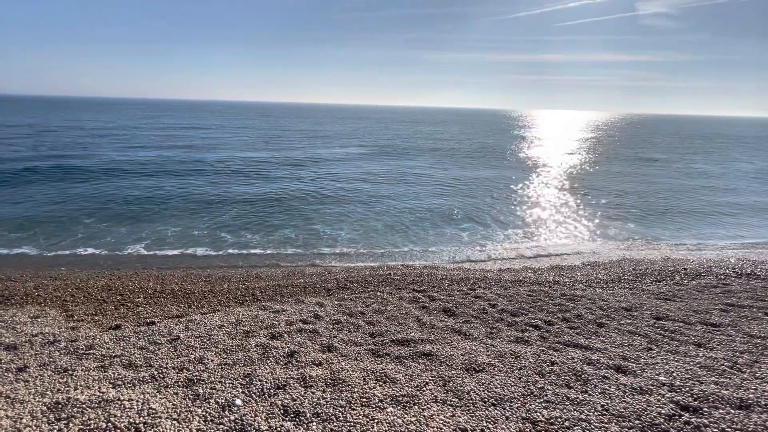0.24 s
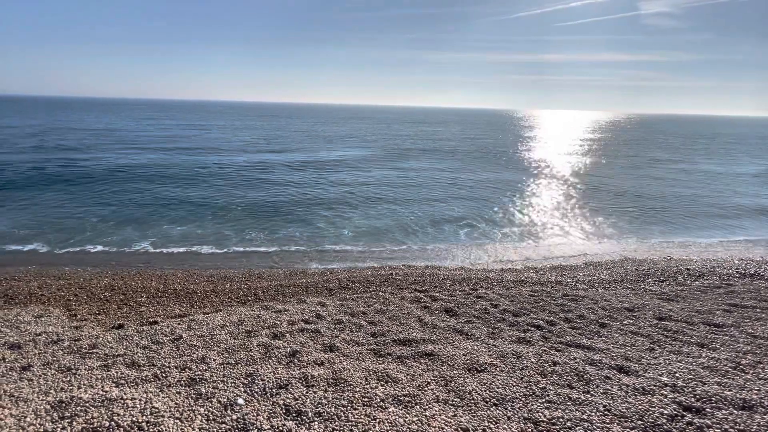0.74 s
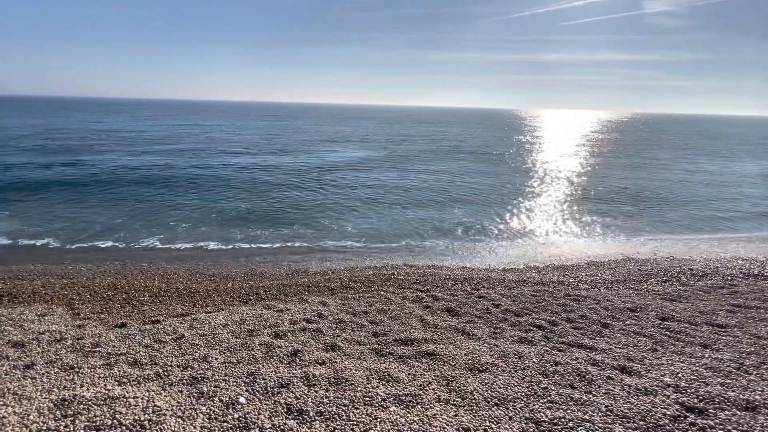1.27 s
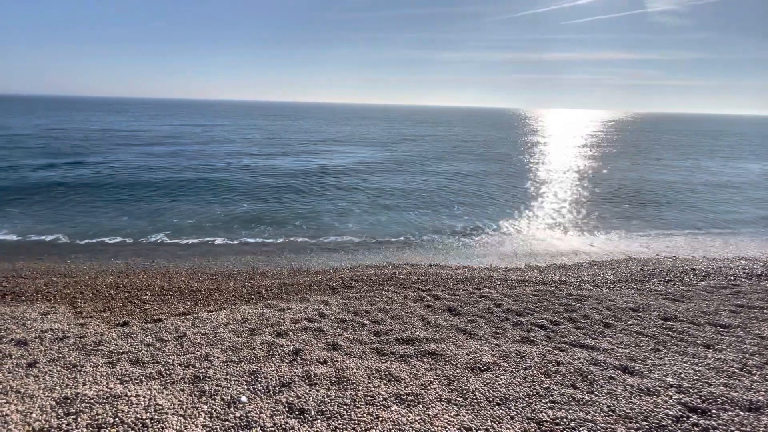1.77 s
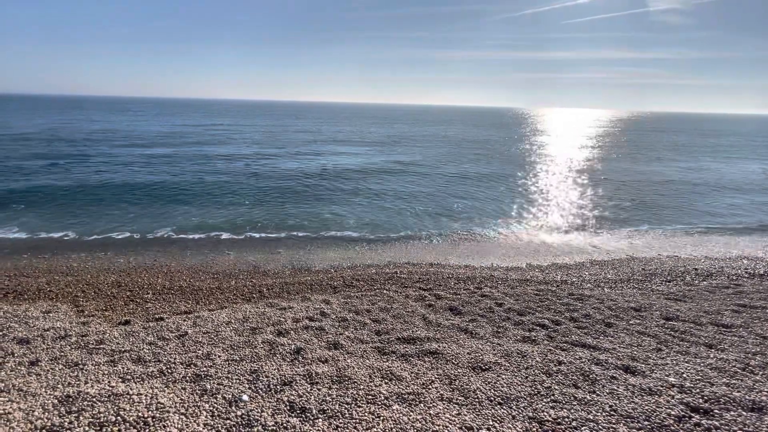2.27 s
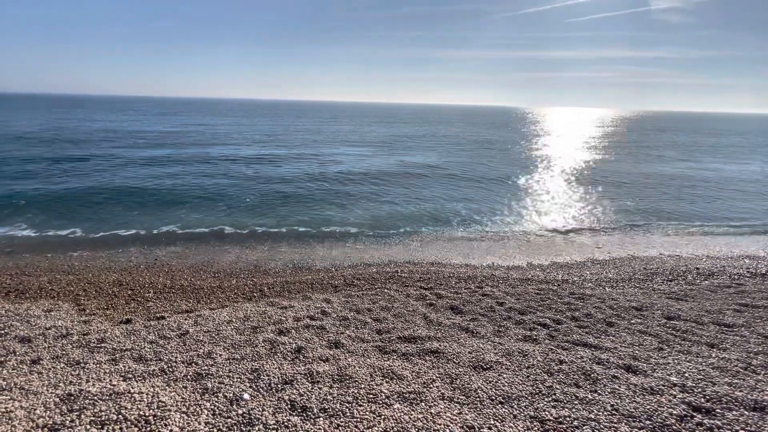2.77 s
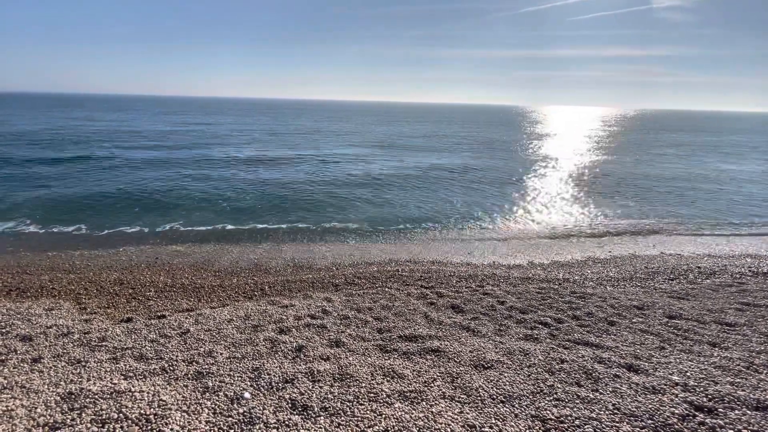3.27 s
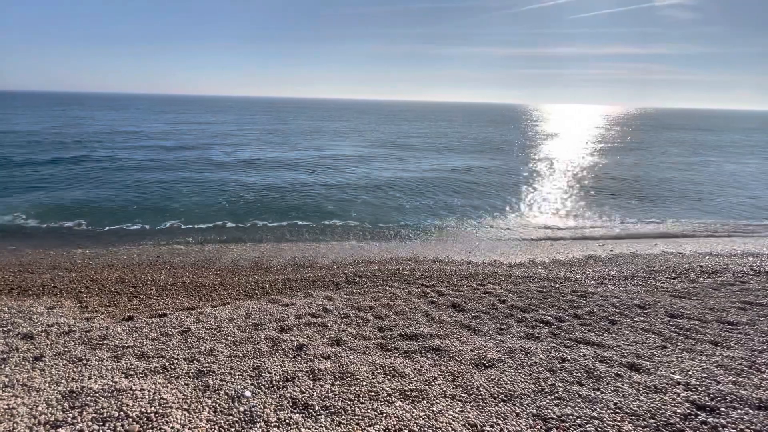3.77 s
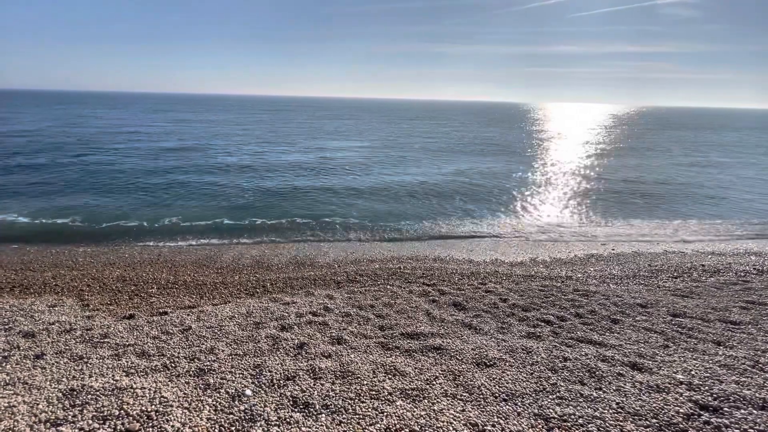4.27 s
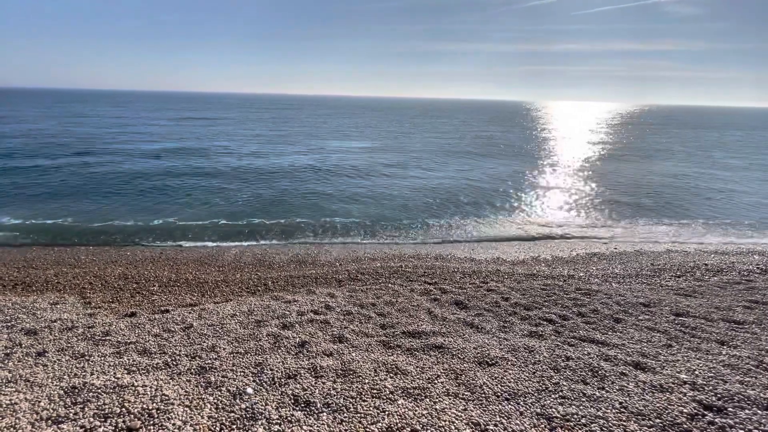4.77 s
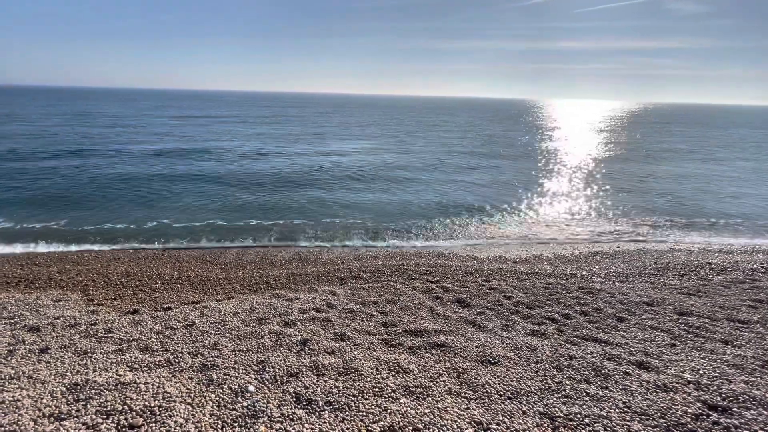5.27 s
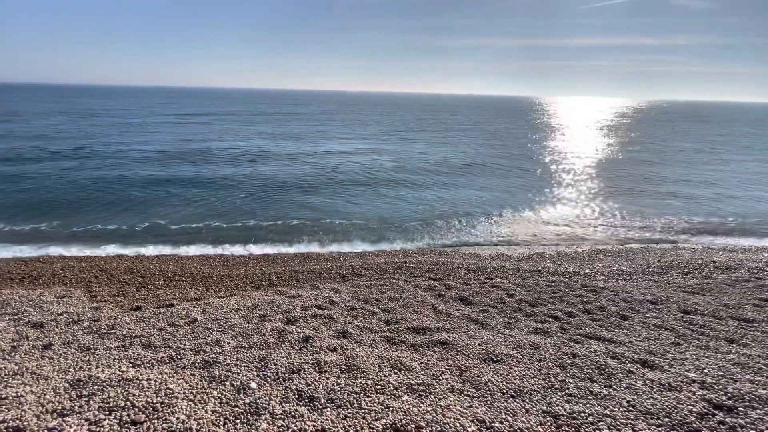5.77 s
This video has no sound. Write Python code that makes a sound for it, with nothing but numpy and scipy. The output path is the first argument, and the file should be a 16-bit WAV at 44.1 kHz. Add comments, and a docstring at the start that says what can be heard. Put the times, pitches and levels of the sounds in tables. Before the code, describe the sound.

Small waves wash up and drain back over pebbles with a steady surf hiss, then a low breaker folds as wind buffets the microphone.

```python
"""A pebble beach with small waves, heard from up the shingle at a pair of close microphone ports.
Backwash, swash, spill and breaker are noise with shaped spectra, coherence and phase between the ports;
brief decaying sines add the stones' knocks. The swash arrives first at the right, the breaker at the left.
Wind is coloured noise in puffs and short gusts. A faint engine, perhaps a far boat, is two harmonics
of a wavering note over low rumble."""
import sys
import numpy as np
from scipy import signal
from scipy.fft import rfft, irfft
from scipy.io import wavfile
from scipy.ndimage import uniform_filter1d

SR = 44100
rng = np.random.default_rng(int(sys.argv[2]) if len(sys.argv) > 2 else 0)


def unload_wav(signal):
    """Save mono or channel-first audio to the path in sys.argv[1] as 16-bit WAV at rate SR, clipped to [-1, 1]."""
    wavfile.write(
        sys.argv[1],
        SR,
        np.round(np.clip(np.atleast_2d(signal).T, -1, 1) * 32767).astype(np.int16),
    )


N = 265393  # samples, about 6 s

# half-width of the rounded crest of each wave's swell [s]
CREST_S = 0.35


def gain_of(db):
    """Level to amplitude: 20 dB is a factor of ten."""
    return 10 ** (np.asarray(db) / 20)


def evened(x):
    """Normalization of mean power: scales a signal to rms 1."""
    return x / np.sqrt(np.mean(x ** 2) + 1e-20)


def at_hz(table, hz):
    """Logarithmic frequency scale: interpolates each column of a table along log frequency."""
    f, *columns = np.transpose(table)
    return [np.interp(np.log(hz + 1), np.log(f + 1), column) for column in columns]


def coloured(x, colour):
    """Linear filtering: multiplies the spectrum by a colour, then scales to rms 1."""
    response_db = at_hz(colour, np.fft.rfftfreq(N, 1 / SR))[0]
    return evened(irfft(rfft(x) * gain_of(response_db), N))


def panned(db):
    """Level difference at constant power: gains of left and right for a left-minus-right level."""
    pair = np.array([gain_of(db / 2), gain_of(-db / 2)])
    return pair / np.sqrt(np.mean(pair ** 2, axis=0))


def noise_pair(correlation):
    """Partial correlation: white noise at two ports, in opposition where the correlation is negative."""
    left, other = rng.standard_normal((2, N))
    right = correlation * left + np.sqrt(1 - correlation ** 2) * other
    return np.array([left, right])


def lumps(shape, size):
    """Random fluctuation smoothed by moving averages over size = (steps in time, bins), at rms 1."""
    field = rng.standard_normal(shape)
    along_time = uniform_filter1d(field, size[0], axis=0)
    return evened(uniform_filter1d(along_time, size[1], axis=1))


def swell(peak_s, rise_db_per_s, fall_db_per_s, hold_s):
    """Exponential growth and decay: a gain straight in dB on both sides, rounded off at 1."""
    t = np.arange(N) / SR - peak_s
    slope = np.where(t < 0, rise_db_per_s, fall_db_per_s)
    return gain_of(-slope * (np.hypot(t, hold_s) - hold_s))


def swells(events, rise_db_per_s, fall_db_per_s, hold_s):
    """Addition of powers: one swell for each (time [s], level [dB]), summed in mean square."""
    power = sum((gain_of(db) * swell(s, rise_db_per_s, fall_db_per_s, hold_s)) ** 2 for s, db in events)
    return np.sqrt(power)


def water(colour, shore, patchy_db, flicker_db, surge_db, pitch=((0, 1),), glide_below_hz=1700):
    """Superposition of countless bubbles and stones: Gaussian noise, patchy, flickering and surging."""
    frame, hop = 1024, 256
    bins = np.fft.rfftfreq(frame, 1 / SR)
    t = np.arange(N // hop + 5) * hop / SR
    shape = (len(t), len(bins))
    # the low bubble notes glide; the effect fades out towards the hiss above them
    glide = np.exp(-(bins / glide_below_hz) ** 2)
    hz = bins / np.interp(t, *np.transpose(pitch))[:, None] ** glide
    a, b, c, d = rng.standard_normal((4, *shape))
    coherence, lead, side_db = at_hz(shore, hz)
    coherence = np.clip(coherence, 0, 0.98)
    left = a + 1j * b
    shared = coherence * np.exp(-1j * lead) * left
    right = shared + np.sqrt(1 - coherence ** 2) * (c + 1j * d)
    patches = patchy_db * lumps(shape, size=(10, 12))
    flicker = flicker_db * lumps(shape, size=(3, 160))
    surge = surge_db * lumps((len(t), 1), size=(16, 1))
    field_db = at_hz(colour, hz)[0] + patches + flicker + surge
    z = np.array([left, right]) * panned(side_db) * gain_of(field_db)
    sound = signal.istft(z.transpose(0, 2, 1), nperseg=frame, noverlap=frame - hop)[1]
    return evened(sound[:, :N])


def pebbles(colour, lead_ms, per_s, spread_db, ring_s, count=24):
    """Impact excitation of damped modes: each stone size has its own ring, delay and side."""
    t, out = np.arange(256) / SR, np.zeros((2, N))
    for hz in np.geomspace(1500, 9000, count):
        struck = rng.random(N) < per_s / count / SR
        knocks = struck * gain_of(spread_db * np.minimum(rng.exponential(1, N), 4))
        # a positive lead delays the right port, a negative one the left; each size scales it by 0 to 2
        late = np.array([[0], [1]]) * lead_ms / 1000 * rng.uniform(0, 2)
        age = np.maximum(t - (late - late.min()), 0)
        ring = np.sin(2 * np.pi * hz * age) * np.exp(-age / ring_s)
        click = ring * panned(rng.normal(1.7, 4.0))[:, None]
        out += signal.oaconvolve(knocks[None], click, axes=1)[:, :N]
    return coloured(out, colour)


def backwash():
    """Drag by draining flow: water runs down through the shingle and knocks stones together."""
    # spectrum of the draining water: (frequency [Hz], relative density [dB])
    backwash_colour = [(40, -36), (150, -14), (350, -12), (600, -9), (900, -7.5), (1300, 0), (1900, 0.5),
                       (2450, 1.4), (2900, -3.5), (3600, -4), (4700, -9.5), (6300, -7.5), (8500, -15.5),
                       (10000, -21.5), (12500, -39)]
    # path to the ports from the shore ahead:
    # (frequency [Hz], coherence [0-1], left phase lead [rad], left minus right level [dB])
    shore_ahead = [(220.0, 0.5, 1, 2.0), (390.0, 0.54, 1.26, 4.5), (1110, 0.81, 3.17, 1.5),
                   (1810.0, 0.84, 3.36, 0.5), (2120, 0.04, 4.56, 0.5), (2280.0, 0.74, 6.0, -3),
                   (2540.0, 1, 7.2, 0.5), (2850, 0.6, 7.3, -1), (2950, 0.65, 7.8, 2.0),
                   (3470, 0.5, 8.4, 3.5), (3920.0, 0.2, 8.5, 4.5), (5210.0, 0.14, 2.7, 3.5),
                   (5940, 0.4, 3.6, 4), (6300, 0.5, 0.54, 0.5), (7900, 0.37, 3.3, 1.5),
                   (8600, 0.65, 1.1, -8), (9470.0, 0, 3.0, -1.5)]
    # slow gatherings, each until the next water covers it: (time of crest [s], level before mix [dB])
    drainings = [(2.2, -33), (4.7, -33)]
    rush = water(backwash_colour, shore_ahead, patchy_db=1.5, flicker_db=0.57, surge_db=0.1)
    stones = pebbles(backwash_colour, lead_ms=0.455, per_s=1300, spread_db=-2.5, ring_s=0.00044)
    flow = swells(drainings, rise_db_per_s=1.8, fall_db_per_s=11.5, hold_s=CREST_S)
    return flow * (gain_of(-1.0) * rush + gain_of(-17) * stones)


def breeze(lumpy_db=3.5, side_db=1.0):
    """Turbulent pressure fluctuation: eddies rumble unevenly at the ports and rise with each puff."""
    # spectrum of turbulence at a port: (frequency [Hz], relative density [dB])
    breeze_colour = [(12, -40), (28, -22), (55, 2.5), (90, -2.5), (150, -5), (250, -15.5), (400, -13.5),
                     (650, -40), (2000, -36)]
    # soft puffs over the steady breeze: (time of peak [s], level [dB])
    puffs = [(0.2, -52), (0.48, -52), (1.24, -54), (1.55, -47.5), (2.05, -55), (2.55, -49), (3.19, -51),
             (3.43, -49), (3.68, -54), (4.2, -33), (4.33, -35), (4.42, -31.5), (5.17, -41.5), (5.33, -45),
             (5.54, -36.5), (5.8, -46), (5.96, -42.5)]
    steady_db = -61
    unevenness = gain_of(lumpy_db * lumps((N, 1), size=(1500, 1))[:, 0])
    rumble = evened(coloured(noise_pair(-0.51), breeze_colour) * unevenness)
    puff_gain = swells(puffs, rise_db_per_s=140, fall_db_per_s=125, hold_s=0.056)
    wind = np.hypot(gain_of(steady_db), puff_gain)
    return wind * rumble * panned(side_db)[:, None]


def drone(waver_hz=0.26):
    """Harmonic series of a periodic source: a far engine's wavering note over well-correlated rumble."""
    # harmonics of the engine: (multiple of the fundamental, relative level [dB])
    engine_orders = [(1, 0.5), (2, -9)]
    # spectrum of the rumble: (frequency [Hz], relative density [dB])
    drone_colour = [(25, -39), (45, -3.5), (68, -1), (100, -3), (140, -11.5), (220, -13.5), (380, -9),
                    (600, -33), (1500, -58)]
    engine_hz, engine_db = 91.6, -49.5
    rumble_db, rumble_floor_db = -42, -60
    peak_s, hold_s = 3.83, 0.18
    # phase in turns is the running integral of frequency
    turns = np.cumsum(engine_hz + waver_hz * lumps((N, 1), size=(12000, 1))[:, 0]) / SR
    hum = evened(sum(gain_of(db) * np.sin(2 * np.pi * k * turns) for k, db in engine_orders))
    hum_gain = gain_of(engine_db) * swell(peak_s, 4, 10, hold_s)
    rumble_swell = gain_of(rumble_db) * swell(peak_s, 12, 23, hold_s)
    rumble_gain = np.hypot(rumble_swell, gain_of(rumble_floor_db))
    rumble = coloured(noise_pair(0.85), drone_colour)
    return hum_gain * hum + rumble_gain * rumble


def swash():
    """Run-up of a spent wave: a rush leading mostly at the right, with rolling stones and early foam."""
    # spectra of the rush and of the foam: (frequency [Hz], relative density [dB])
    swash_colour = [(40, -30), (150, -24.5), (350, -13.5), (650, -13.5), (950, -3), (1250, 0), (1600, -0.6),
                    (2000, 1.5), (2450, -3.5), (2900, -1.5), (3600, -9.5), (4700, -10.5), (6000, -17),
                    (7800, -13), (10000, -29.5), (12500, -37)]
    foam_colour = [(300, -15), (900, -1), (1200, -1), (2400, -1.5), (4000, 0.5), (6300, -3), (8000, -2.5),
                   (10000, -26), (12500, -33)]
    # path to the ports from the shore on the right:
    # (frequency [Hz], coherence [0-1], left phase lead [rad], left minus right level [dB])
    shore_right = [(220.0, 0.96, 0.6, 0.5), (600.0, 0.82, -2.2, 5), (690.0, 0.72, -2.8, 8.5),
                   (960, 0.36, 0.5, 2.0), (1330, 0.37, -2, 4.0), (1510.0, 0.95, -2.5, 3.5),
                   (1850.0, 0.18, -3.5, 8.5), (1980.0, 0.48, -5.1, 8), (2370.0, 0.25, -5.5, 7),
                   (2520, 0.31, -5, 7), (3030, 0.86, -6, 5.5), (3250, 0.54, -3.5, -5),
                   (3750, 0.36, -5.5, -3), (4350.0, 0.36, -0.2, -5), (5810.0, 0.8, 2.5, 0.5),
                   (6470, 0.48, -0.3, 7), (7360.0, 0.18, 4, 10.0), (8040, 0.35, -7, 10.0),
                   (9700, 0.22, -1.5, 3)]
    # pitch sinks as the swash spreads, then recovers a little: (time [s], frequency factor)
    swash_pitch = [(2.0, 1.03), (2.7, 0.97), (3.6, 0.92), (4.5, 0.97)]
    # quick run-ups that soak away slowly: (time of crest [s], level of the rush [dB])
    run_ups = [(0.1, -44.5), (2.72, -28)]
    foam_lead_s, foam_db = 0.77, -10  # relative to each run-up
    rush = water(swash_colour, shore_right, patchy_db=1.0, flicker_db=0.06, surge_db=0.05,
                 pitch=swash_pitch, glide_below_hz=4800)
    stones = pebbles(swash_colour, lead_ms=-0.27, per_s=1400, spread_db=2.0, ring_s=0.00046)
    foam = water(foam_colour, shore_right, patchy_db=1.5, flicker_db=0.9, surge_db=0.0)
    flow = swells(run_ups, rise_db_per_s=13, fall_db_per_s=4.5, hold_s=CREST_S)
    fronts = [(s - foam_lead_s, db + foam_db) for s, db in run_ups]
    fizz = swells(fronts, rise_db_per_s=21, fall_db_per_s=10, hold_s=CREST_S)
    return flow * (rush + gain_of(-19.0) * stones) + fizz * foam


def breaker():
    """Air entrainment and impact: the crest folds on the left, and bubbles roar as water thumps and sprays."""
    # spectra of the bubbles, the falling water and the spray: (frequency [Hz], relative density [dB])
    breaker_colour = [(40, -27), (150, -13), (280, -13.5), (380, -6.5), (490, -10.5), (620, 0), (720, 1),
                      (860, 1), (1000, -4), (1400, -7.5), (2200, -12.5), (3200, -15), (5000, -20),
                      (9000, -21), (12500, -34)]
    plunge_colour = [(50, -20), (140, -6), (185, -5), (225, 4), (275, 0), (400, 1.5), (500, -6), (900, -46)]
    splash_colour = [(200, -41), (600, -12), (1200, 0.5), (2500, 1.5), (3300, -1), (4500, -3), (6000, -5.5),
                     (8000, -5.5), (10000, -25), (12500, -32)]
    # path to the ports from the shore on the left:
    # (frequency [Hz], coherence [0-1], left phase lead [rad], left minus right level [dB])
    shore_left = [(220.0, 0.1, 2.35, 1.5), (390.0, 0.79, 1.04, -0.5), (613, 0.52, 3.05, 6.5),
                  (784, 0.46, 1.8, 6), (950.0, 0.47, 2.44, 6.5), (1230, 0.55, 3.1, -2),
                  (1560, 0.26, 4.2, 5), (1810.0, 1, 1.9, 3.5), (2280.0, 0.4, 4.6, 5.0),
                  (2500.0, 0.66, 8.9, 13), (2840.0, 0.96, 5.3, 4.5), (3190.0, 0.33, 8.5, 8),
                  (3960.0, 0.36, 10.3, 0), (4280, 0.49, 11.2, -1), (5120.0, 0.34, 13.0, -2),
                  (5810.0, 0.63, 15.8, 1), (6200, 0.39, 11.8, 7), (7670.0, 0.23, 16, 5),
                  (8530.0, 0.35, 13.5, 2.0), (9470.0, 0.1, 19, -1)]
    # the roar deepens overall as the fold traps larger bubbles: (time [s], frequency factor)
    breaker_pitch = [(4.2, 1.45), (4.8, 1.05), (5.35, 1.07), (5.85, 0.98)]
    # a brief burst of roar and spray at 0.1 s, then successive collapses along the crest: (time [s], spray
    # level [dB], thump level [dB])
    collapses = [(0.1, -40.5, -52.5), (3.33, -44, -48), (3.8, -44, -52), (4.19, -54, -38), (4.28, -50, -38),
                 (4.4, -42.5, -35.5), (4.56, -57, -38.5), (4.82, -37.5, -41.5), (5.149, -33.5, -39),
                 (5.32, -36.5, -38.5), (5.45, -41, -38), (5.58, -34, -42), (5.85, -45, -58)]
    fold_peak_s, fold_db = 5.45, -29.5
    trapped_air_db = -3.5  # roar of each collapse relative to its thump
    roar = water(breaker_colour, shore_left, patchy_db=1.7, flicker_db=0.4, surge_db=0.53, pitch=breaker_pitch)
    thump = water(plunge_colour, shore_left, patchy_db=-0.2, flicker_db=1.2, surge_db=0.85)
    splash = water(splash_colour, shore_left, patchy_db=1.5, flicker_db=2.7, surge_db=1.7)
    # the breaking crest comes nearer along the shore, then passes its height
    fold = gain_of(fold_db) * swell(fold_peak_s, rise_db_per_s=8.5, fall_db_per_s=5, hold_s=CREST_S)
    shape = {"rise_db_per_s": 68, "fall_db_per_s": 44, "hold_s": 0.055}
    times, spray_db, thump_db = np.transpose(collapses)
    fall = swells(zip(times, thump_db), **shape)
    spray = swells(zip(times, spray_db), **shape)
    roar_gain = np.hypot(fold, gain_of(trapped_air_db) * fall)
    return roar_gain * roar + fall * thump + spray * splash


def gusts(eddy_db=-8.5, growth=0.58):
    """Advection of eddies: buffets in opposite phase, brighter when faster or harder."""
    # buffets: (time [s], level [dB], length [s], left minus right level [dB], relative air speed)
    buffets = [(0.16, -43, 0.0094, 18, 0.95), (0.179, -40.5, 0.012, 20, 0.81),
               (0.205, -37, 0.012, 16, 0.69), (0.259, -30.5, 0.023, 12, 0.86),
               (0.346, -33.5, 0.009, 15, 0.8), (0.933, -42, .022, 9, 1.9), (1.511, -47, 0.05, -3, 0.86),
               (3.17, -39, 0.032, 15, 0.5), (3.24, -41, 0.044, 18, 0.7), (3.71, -35, .022, 15, 0.66),
               (4.014, -17.5, 0.016, 1, 1.08), (4.052, -16.5, 0.014, 3, 1.03), (4.067, -18, 0.02, -4, 1.04),
               (4.088, -16, 0.013, 4.5, 0.94), (4.108, -21, 0.013, -4, 0.99), (4.16, -31, 0.016, -3, 1.08),
               (4.261, -33, 0.05, 0, 1.4), (4.379, -35, 0.046, -2, 1.5), (4.463, -18, 0.032, 1.5, 1.08),
               (4.493, -24, 0.018, -1.5, 0.97), (5.557, -28, 0.025, 3, 0.49), (5.594, -19, 0.0095, 1, 1.9),
               (5.616, -30, .014, 3, 0.84), (5.754, -31, 0.015, 25, 0.8), (5.84, -36, .021, 5, 0.74)]
    # spectra at unit air speed of the swirl and the finer eddies: (frequency [Hz], relative density [dB])
    swirl_colour = [(12, -40), (28, -27), (55, -10), (95, 5.5), (170, 3.5), (230, -10), (350, -29),
                    (900, -56)]
    eddy_colour = [(40, -23), (130, 1), (220, 4), (400, -2.5), (600, -19), (2500, -47)]
    t, out = np.arange(N) / SR, np.zeros((2, N))
    swirl = coloured(noise_pair(-1.0), swirl_colour)
    # even out the swirl's local power, so that its own fluctuations do not set a buffet's size
    swirl = swirl / np.sqrt(uniform_filter1d((swirl ** 2).mean(0), size=500) + 1e-9)
    eddies = coloured(noise_pair(0.081), eddy_colour)
    hardest_db = max(row[1] for row in buffets)
    for s, db, length, side_db, speed in buffets:
        near = abs(t - s) < 2 * length
        age = t[near] - s
        # harder gusts carry a larger share of fine eddies
        air = swirl + gain_of(eddy_db + growth * (db - hardest_db)) * eddies
        # faster air sweeps the same eddies past the ports at a higher pitch
        passing = np.array([np.interp(s + speed * age, t, port) for port in air])
        force = gain_of(db) * np.exp(-2 * (age / length) ** 2)
        out[:, near] += force * panned(side_db)[:, None] * passing
    return out


def spill():
    """Bubble resonance in narrow bands: off to the right the crest spills in a brief gargle."""
    # spectrum of the small bubbles: (frequency [Hz], relative density [dB])
    spill_colour = [(300, -16), (600, -2), (850, -6), (1100, -17), (1350, -30), (1700, 2), (2150, -19),
                    (2620, 1.5), (3300, -40), (9000, -43)]
    # path to the ports from the spill:
    # (frequency [Hz], coherence [0-1], left phase lead [rad], left minus right level [dB])
    shore_spill = [(600, 0.4, -3.5, 2), (1670, 0.75, -3.5, -12), (2670, 0.93, -7.5, 3)]
    peak_s, level_db = 4.32, -35
    bubbles = water(spill_colour, shore_spill, patchy_db=1.0, flicker_db=1.0, surge_db=0.3)
    return gain_of(level_db) * swell(peak_s, rise_db_per_s=17, fall_db_per_s=13, hold_s=0.28) * bubbles


def scene():
    """Linear superposition: the pressures of shore, wind and drone add."""
    return backwash() + breeze() + drone() + swash() + breaker() + gusts() + spill()


def record(dry):
    """Resonance and band limitation: the housing colours the sound, then a low-pass cuts the top."""
    # broad peaks and dips of the microphone housing: (centre [Hz], width [Hz], gain [dB])
    housing = [(2420, 1460, -1), (5900, 1230, 3), (7840, 510, -1.5), (10400, 7400, -0.5)]
    edge_hz = 13100
    hz = np.fft.rfftfreq(N, 1 / SR)
    colour_db = sum(db / (1 + (2 * (hz - centre) / width) ** 2) for centre, width, db in housing)
    heard = irfft(rfft(dry) * gain_of(colour_db), N)
    low_pass = signal.firwin(511, edge_hz, window=("kaiser", 9), fs=SR)
    return signal.oaconvolve(heard, low_pass[None], "same", axes=1)


dry = scene()
out = record(dry)
unload_wav(out)
```